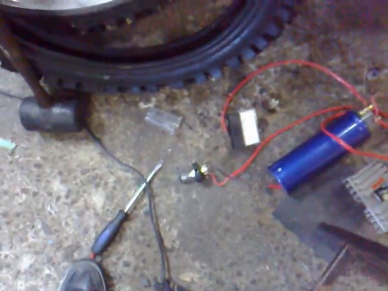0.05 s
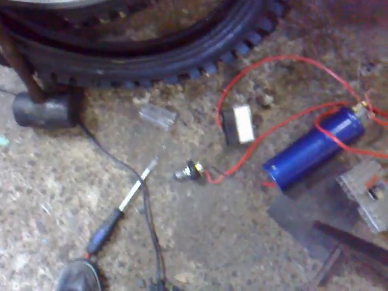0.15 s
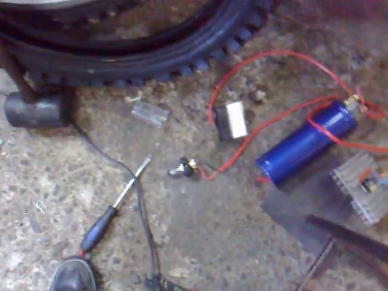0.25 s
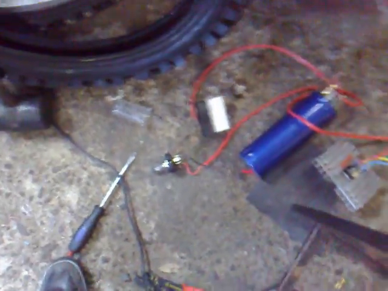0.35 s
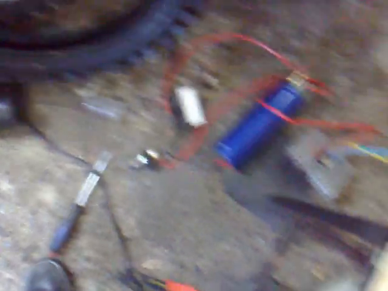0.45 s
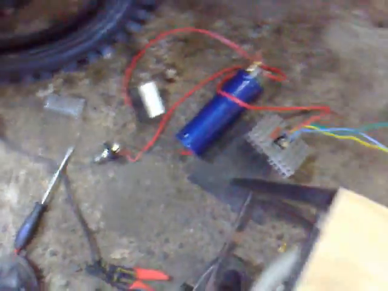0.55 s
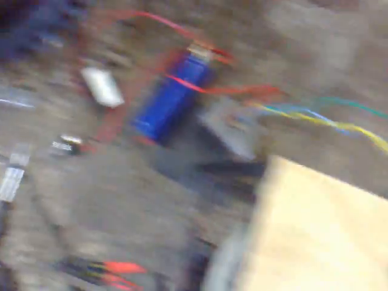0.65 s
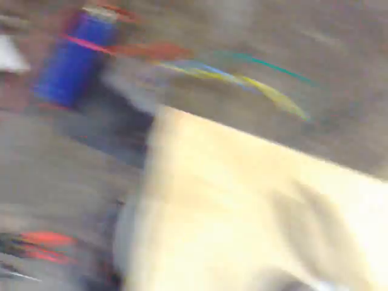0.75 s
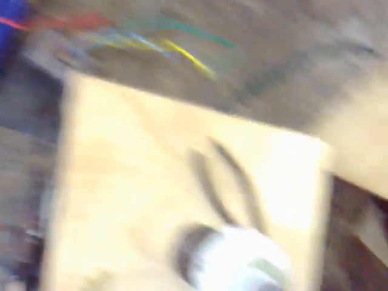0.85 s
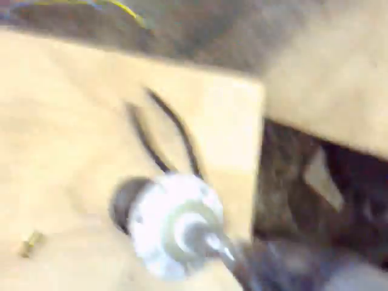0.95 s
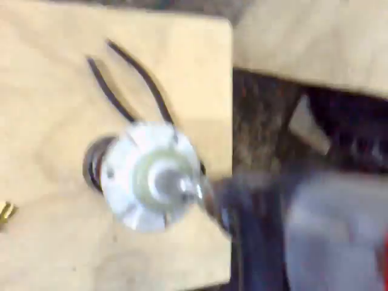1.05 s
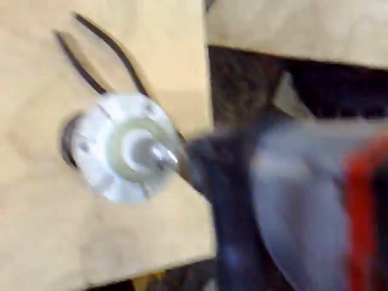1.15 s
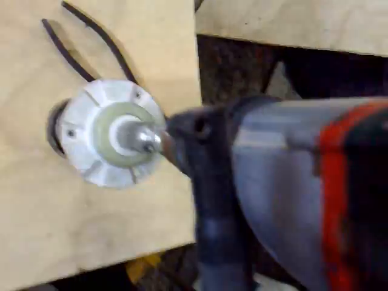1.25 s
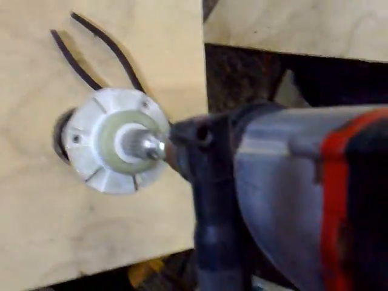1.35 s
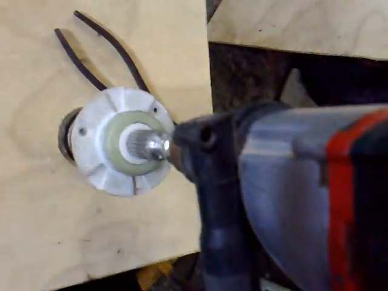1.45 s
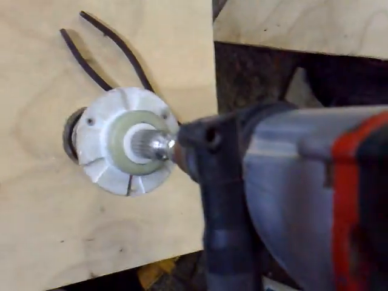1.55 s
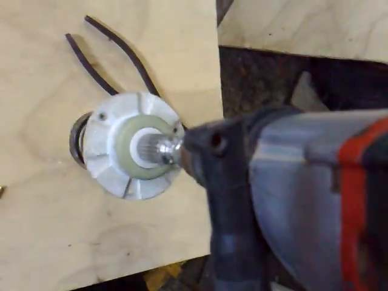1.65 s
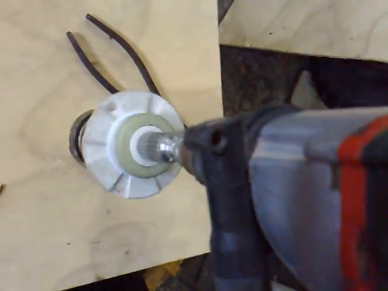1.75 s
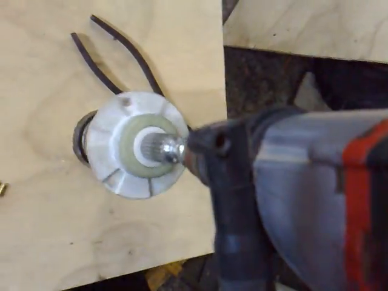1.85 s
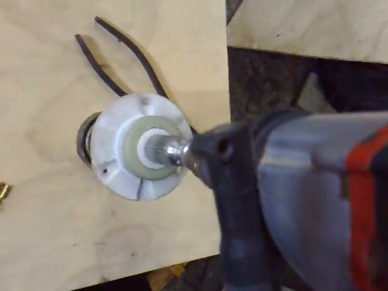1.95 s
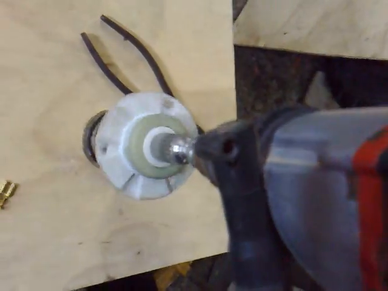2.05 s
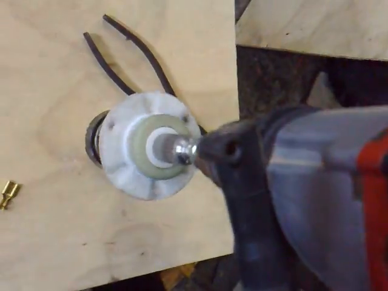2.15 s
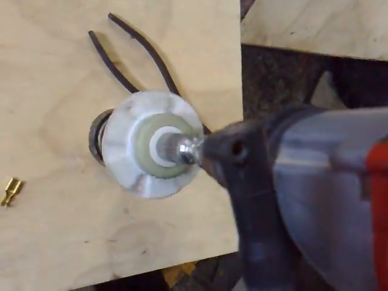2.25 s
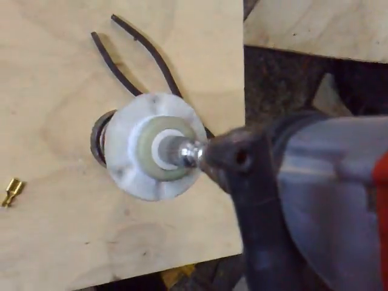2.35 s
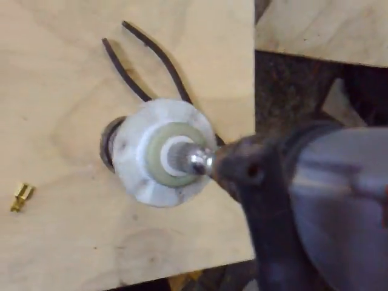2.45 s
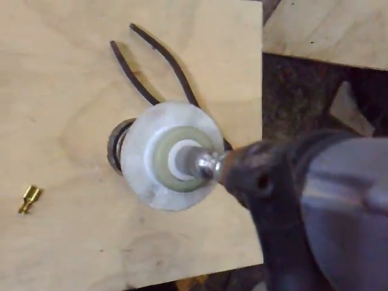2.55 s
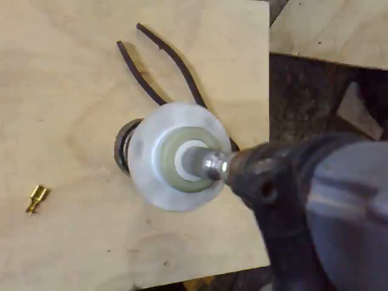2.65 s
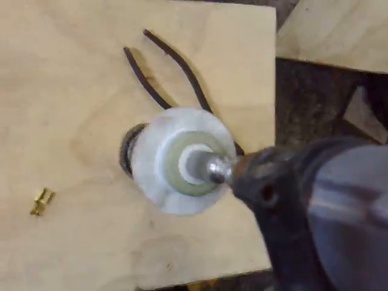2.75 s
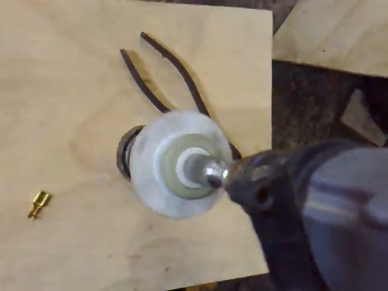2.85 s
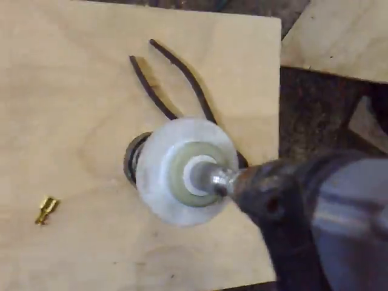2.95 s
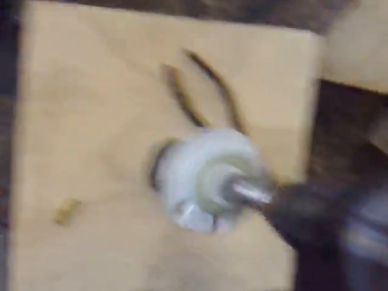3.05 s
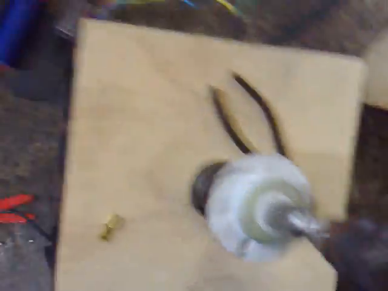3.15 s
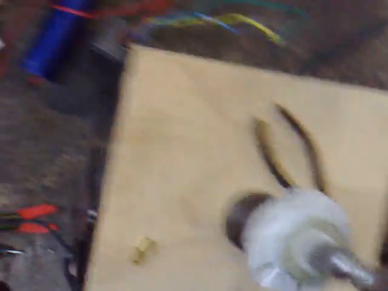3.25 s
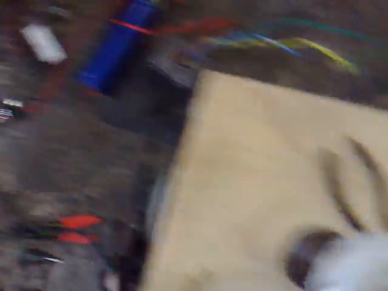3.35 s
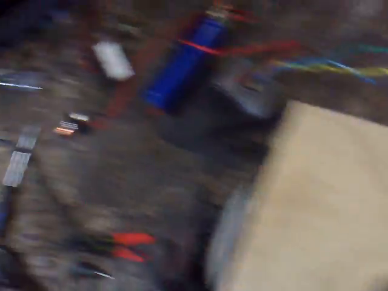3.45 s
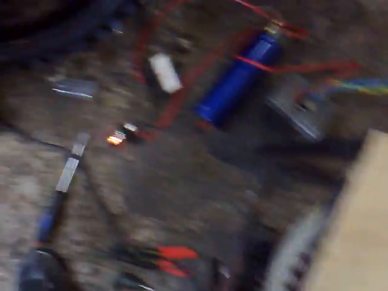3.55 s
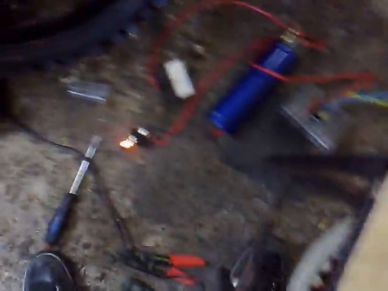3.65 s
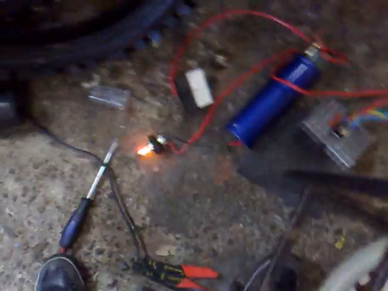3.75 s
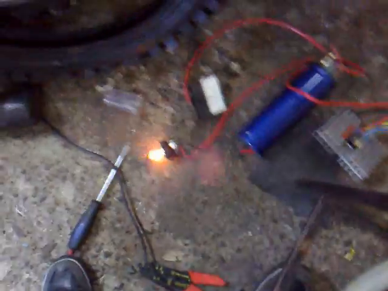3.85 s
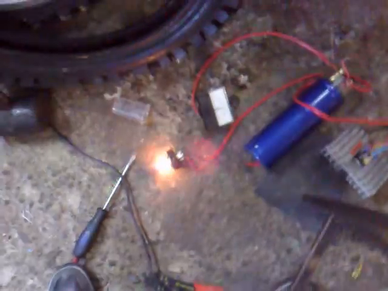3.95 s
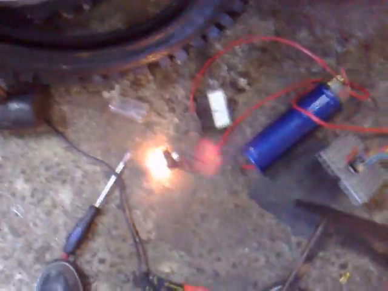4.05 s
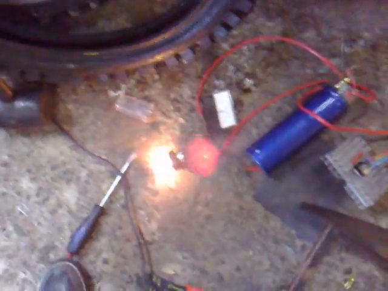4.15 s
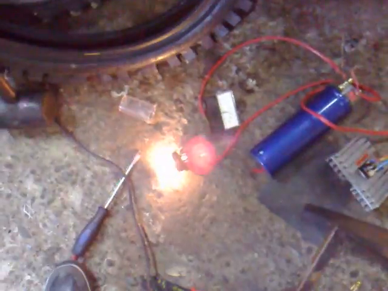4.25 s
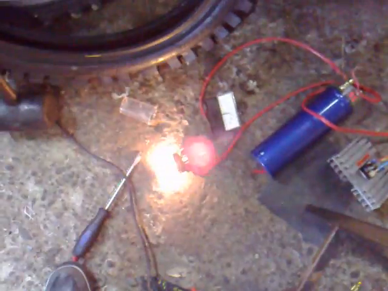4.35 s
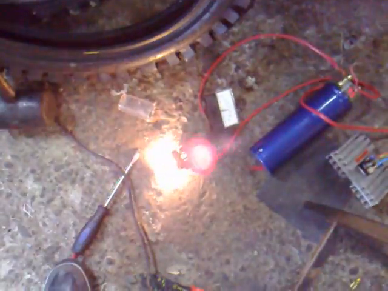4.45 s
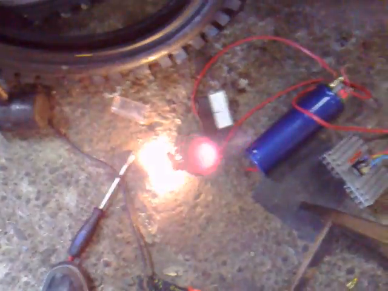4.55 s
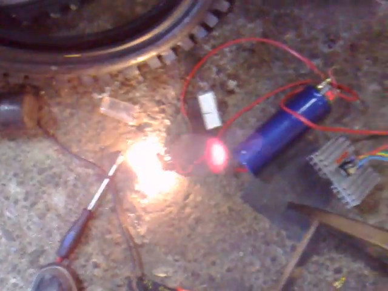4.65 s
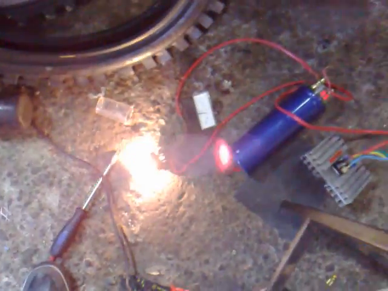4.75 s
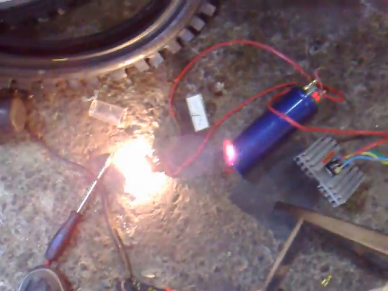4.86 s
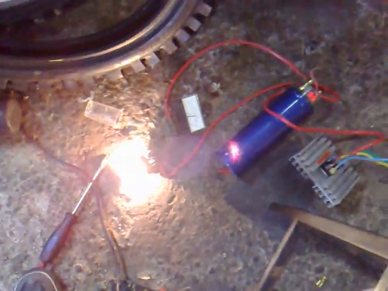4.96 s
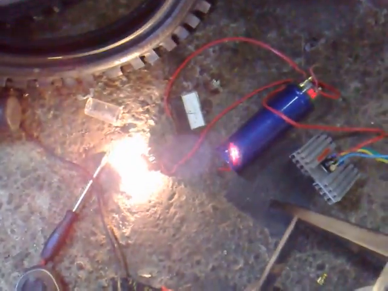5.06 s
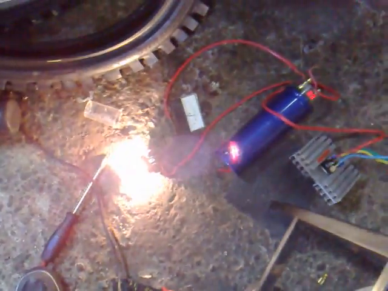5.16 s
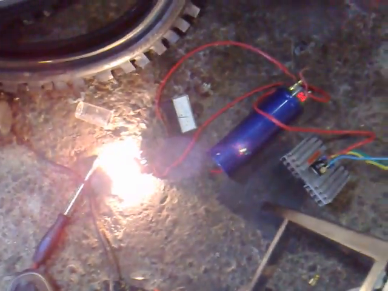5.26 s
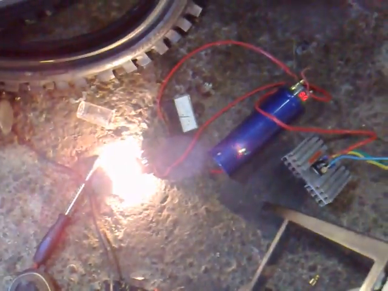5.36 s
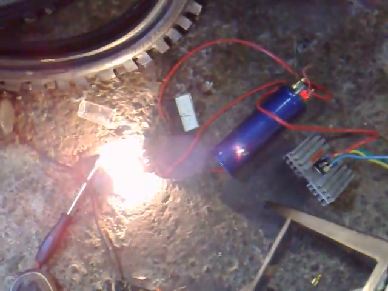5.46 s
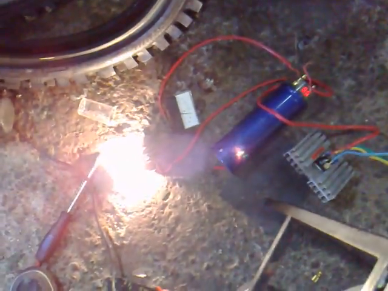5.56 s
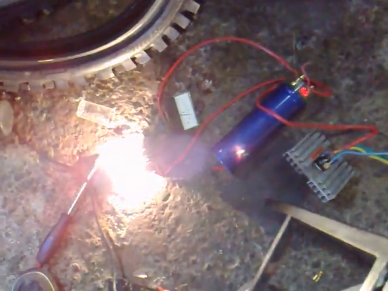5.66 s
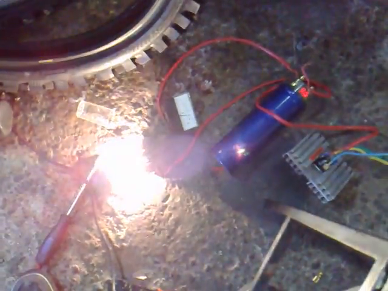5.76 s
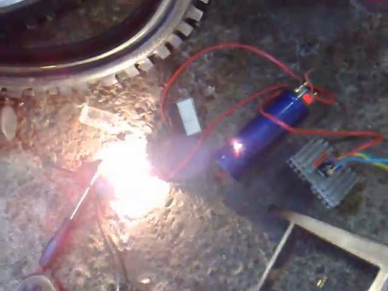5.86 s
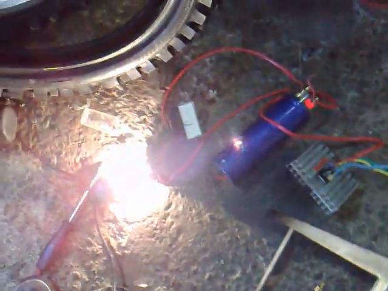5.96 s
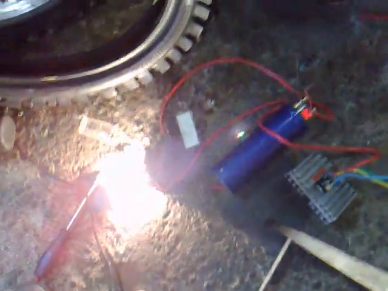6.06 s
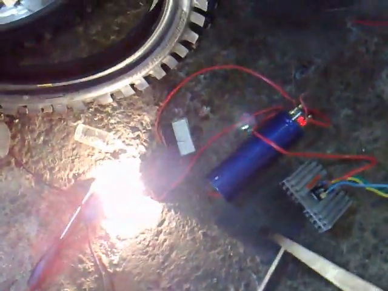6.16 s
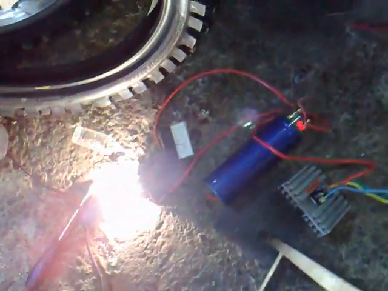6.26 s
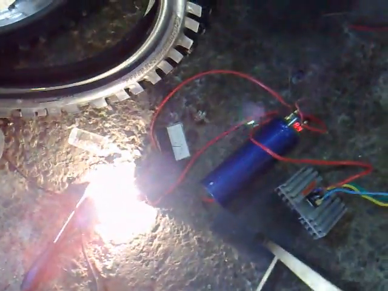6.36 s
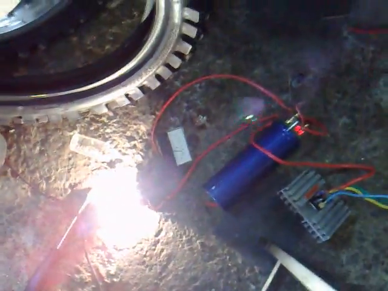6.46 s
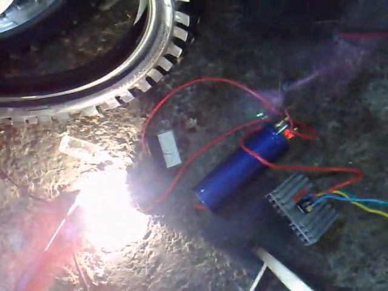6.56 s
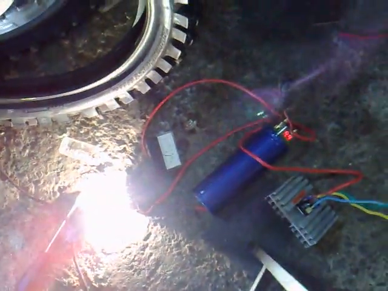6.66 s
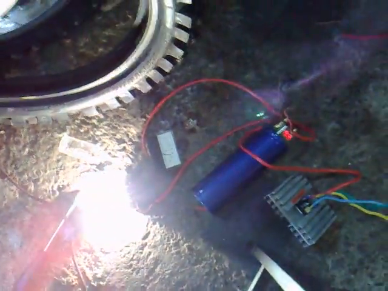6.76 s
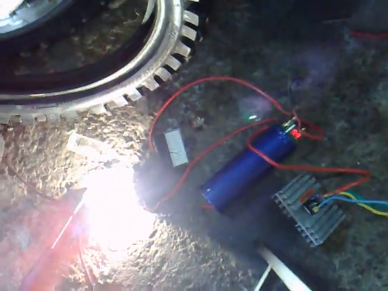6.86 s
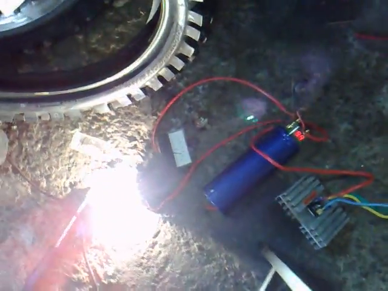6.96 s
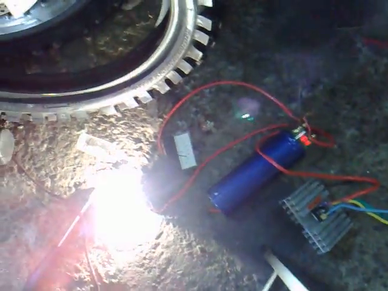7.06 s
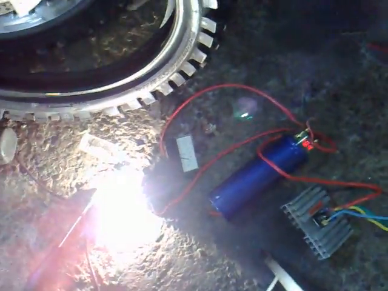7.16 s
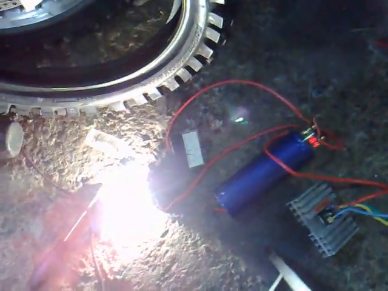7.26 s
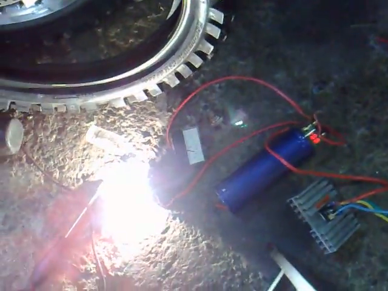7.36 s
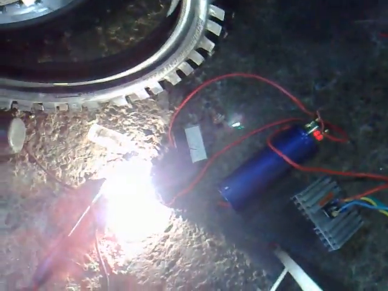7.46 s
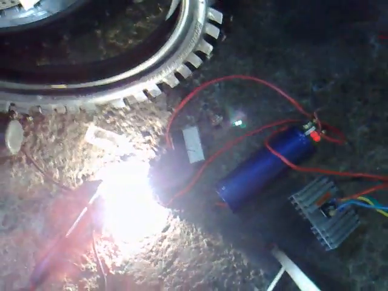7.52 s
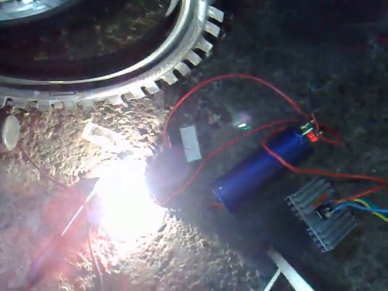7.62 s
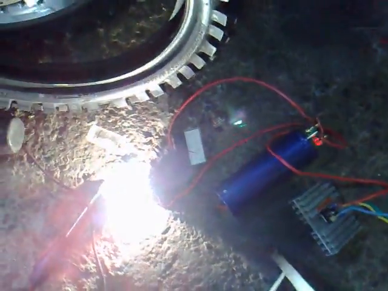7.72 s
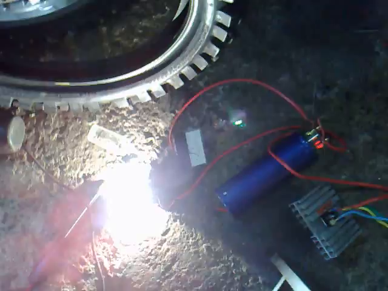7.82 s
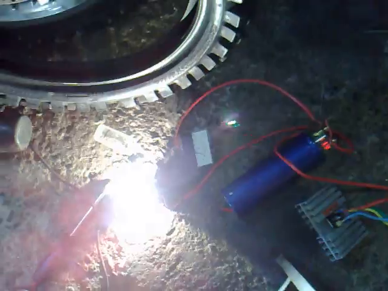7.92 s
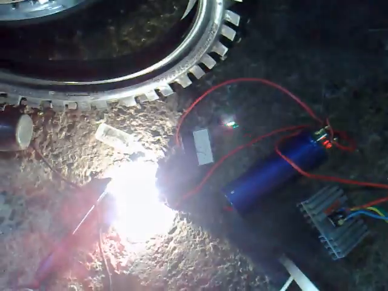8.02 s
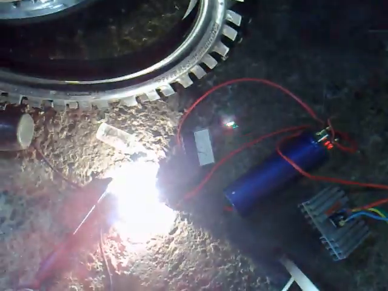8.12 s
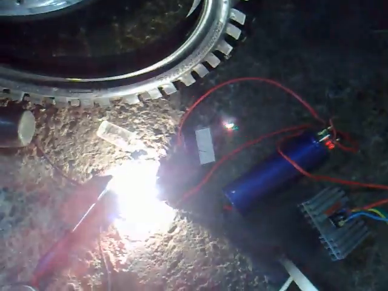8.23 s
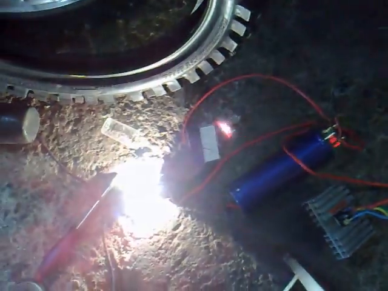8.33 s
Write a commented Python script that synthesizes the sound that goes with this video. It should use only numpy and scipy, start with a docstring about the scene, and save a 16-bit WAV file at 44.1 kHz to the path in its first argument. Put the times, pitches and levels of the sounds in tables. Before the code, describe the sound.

An electric drill drives a small motor on a wooden board, heard from close by in a quiet workshop. From about 0.3 seconds the drill hums and sizzles without turning, and a buzzing crackle from its brushes grows louder. At about 1.6 seconds the gears begin to rattle, with several hard knocks around 2 seconds and a low rising growl. The metal coupling scrapes, then squeals from roughly 2.6 to 3.7 seconds, as a whine climbs and the rattle smooths into a hissing rush. The whine is fairly steady from 4 seconds, then steps up at about 5.5 seconds to a higher, slightly wavering pitch. Underneath, the board shakes with a faint rumble and a few soft bumps. Near 7.9 seconds the pitch falls quickly, and the drill is still running more slowly at the end, around 8.4 seconds.

```python
"""A drill driving a generator

A mains drill spins a small motor as a generator on a board on a workshop floor, heard from close by.
With the trigger barely pressed it stands still: chopped current makes the windings hum and the brushes
crackle. Then the gears rattle through their backlash, the coupling scrapes, and tones locked to the
rotation whine up to speed, step up once more and drop back. The board shakes and booms beneath it."""
import sys
import numpy as np
from scipy import signal
from scipy.fft import rfft, irfft, next_fast_len
from scipy.io import wavfile
from scipy.ndimage import uniform_filter1d

SR = 44100
rng = np.random.default_rng(int(sys.argv[2]) if len(sys.argv) > 2 else 0)


def unload_audio(sound):
    """Save the sound as a 16-bit wav file, at the path given as the first command line argument."""
    columns = np.transpose(np.atleast_2d(sound))
    # keep every value between -1 and 1, then stretch to whole-number steps
    steps = np.round(np.clip(columns, -1, 1) * 32767)
    wavfile.write(sys.argv[1], SR, steps.astype(np.int16))


N = 369999
TIME = np.arange(N) / SR
MAINS_HZ, FIRST_FIRING_S = 50.07, .0058
TRIGGER_S, ROTOR_START_S = .23, 1.55

# rotor speed after the initial creep: (time [s], speed [turns/s])
ROTOR_SPEED = [(2.6, 91), (2.86, 183), (3.0, 223), (3.2, 251), (3.48, 259), (3.68, 293), (3.95, 318),
               (4.48, 320), (4.66, 336), (5.12, 338), (5.38, 353), (5.56, 432), (5.76, 476), (5.96, 487),
               (6.3, 477), (6.56, 485), (7.3, 456), (7.46, 474), (7.86, 465), (8.0, 366), (8.17, 267),
               (8.38, 254)]
# background of the workshop: (frequency [Hz], relative level [dB])
ROOM_SPECTRUM = [(18, -31), (30, -10), (70, -24), (86, -19), (106, -11), (157, -7), (210, -5.5), (364, -15),
                 (499, -14), (1100, -24), (16000, -37)]
# shaking of the board: (frequency [Hz], relative level [dB])
SHAKE_SPECTRUM = [(20, -5), (50, 8.5), (110, 4.5), (200, -4), (350, -17), (800, -50)]
# soft bumps of the board: (time [s], level [dB])
BOARD_BUMPS = [(0.588, -40), (2.94, -33), (3.22, -34), (4.435, -37), (5.57, -31), (6.85, -36)]
# colour of a bump: (frequency [Hz], relative level [dB])
BUMP_SPECTRUM = [(40, -13), (110, -5), (220, -4), (400, -1), (900, -25)]
# partials of the windings: (multiple of the mains frequency [1], level against the hum [dB])
HUM_PARTIALS = [(4, -13.5), (8, -15.5), (12, -10.5), (13, -15), (14, -11.5), (16, -23), (18, -17),
                (20, -16), (21, -34)]
# sizzle of the live windings: (frequency [Hz], relative level [dB])
SIZZLE_SPECTRUM = [(100, -32), (450, 6.5), (800, 2), (1350, -6), (2000, 3.5), (2400, 0), (3200, 6.5),
                   (4000, -1), (5000, -2), (6000, -14), (16000, -20)]
# spells of arcing at standstill: (start [s], end [s], level above the steady growth [dB])
ARCING_SPELLS = [(.375, 0.46, 0.5), (.5, 1.339, 0.8), (1.381, 1.535, 0.5)]
# crackle of the brushes: (frequency [Hz], relative level [dB])
ARC_SPECTRUM = [(600, -22), (1400, -20), (2300, -20), (3100, -16), (4300, -9), (6300, -7.5), (7400, -12),
                (8500, -2.5), (9500, -7), (10000, 2), (12000, -4), (12900, 0), (14000, -10), (16000, -16)]
# resonances of the brush gear: (frequency [Hz], bandwidth [Hz], lift [dB])
BRUSH_RESONANCES = [(3300, 250, 5), (4260, 230, 9.5), (5600, 160, 6), (9950, 200, 4.5)]
# the running drill: (time [s], casing rumble [dB], gear rattle [dB], brush hiss [dB])
RUNNING_LEVELS = [(1.57, -46, -43, -62), (1.69, -39, -21.5, -40.5), (2.06, -37.5, -20.5, -37),
                  (2.27, -32, -13, -27), (2.5, -35.5, -17.5, -31), (2.7, -31, -12, -21),
                  (3.05, -41.5, -15, -21.5), (3.5, -44.5, -15.5, -24), (3.8, -40.5, -19.5, -25.5),
                  (5.35, -39, -19, -25.3), (5.6, -39.5, -18.5, -22.5), (6.6, -38.5, -20.5, -27),
                  (7.85, -37, -20, -27), (8.05, -38, -21.5, -30.5), (8.39, -37.5, -20.5, -30)]
# gears at low speed: (frequency [Hz], relative level [dB])
SLOW_GEAR_SPECTRUM = [(60, -34), (200, -27.5), (400, -15.5), (750, -17), (1100, -1.5), (1650, 2.5),
                      (2000, -2.5), (2600, -8.5), (2950, -3), (3250, 0), (3650, -7), (5000, -3),
                      (6500, -11), (8700, -15.5), (11000, -17), (16000, -28.5)]
# gears at high speed: (frequency [Hz], relative level [dB])
FAST_GEAR_SPECTRUM = [(60, -45), (280, -27.5), (450, -18.5), (700, -12), (1050, -5.5), (1500, -1),
                      (2200, 1), (2500, 1), (3500, -0.5), (4700, 0), (6700, -2), (9000, 1), (11400, 1),
                      (16000, -14)]
# resonances of the housing: (frequency [Hz], bandwidth [Hz], lift [dB])
HOUSING_RESONANCES = [(633, 54, 7.5), (830, 24, 6.5), (1600, 200, 0.5), (2030, 206, 10), (2940, 490, 3.5),
                      (3995, 710, 6), (4760, 126, 2), (5800, 2130, 3), (7650, 100, 3), (10340, 410, 3)]
# the hardest gear knocks at a crawl: (time [s], level [dB])
HARD_KNOCKS = [(1.626, -18), (1.823, -9), (1.889, -6.5), (1.907, -14), (1.923, -4.5), (1.931, -8),
               (1.964, -7.5), (2.064, -9)]
# partials of the growl: (order [cycles/turn], level against the rumble [dB])
GROWL_PARTIALS = [(4, -22), (5, -15), (6, -9), (7, -5.5)]
# the coupling scrapes, then squeals: (start [s], attack [s], end [s], release [s], level [dB])
SCRAPE_SPELLS = [(1.9, 0.77, 2.7, .2, -35), (2.55, 0.19, 3.72, .25, -23)]
# ringing modes of the coupling: (frequency [Hz], bandwidth [Hz], relative level [dB])
COUPLING_MODES = [(2720, 160, -7), (3750, 300, -3), (4130, 150, 0), (5430, 250, -1), (7000, 220, -2.5),
                  (10650, 280, -5), (11950, 200, -11)]
# how the casing carries the sixth order, once faded in: (frequency [Hz], level against the rattle [dB])
SIXTH_ORDER_RESPONSE = [(550, -37), (750, -32), (850, -12.5), (1470, -2.5), (1570, -12.5), (1900, -12),
                        (2030, -9.5), (2400, -10), (2600, -4), (2900, -12.5)]
# how it carries the third order, once faded in: (frequency [Hz], level [dB])
THIRD_ORDER_RESPONSE = [(300, -47), (690, -48), (770, -35.5), (900, -40), (975, -45), (1000, -29),
                        (1100, -32), (1410, -25.5), (1460, -32.5)]
# gear, fan and bearing tones, once faded in:
# (order [cycles/turn], base line width [Hz], level at slow [dB], middle [dB], top speed [dB])
ROTOR_TONES = [(0.997, 3.07, -68, -71, -53.5), (1.266, 1.89, -74, -51, -36.5), (1.731, 2.35, -68, -46, -39),
               (1.96, 5.2, -67, -53, -61), (2.54, 4.6, -61, -42.5, -46), (3.996, 3.97, -45, -39, -39),
               (4.273, 5, -34.5, -35.5, -30.5), (5.55, 3, -60, -51, -34), (5.805, 2.6, -62, -56, -30.5),
               (6.18, 3, -50, -39, -30.5), (9.01, 2, -42, -42, -30), (10.94, 6, -54, -44, -50),
               (12, 45, -48, -35, -36), (13.49, 110, -45, -30.5, -35), (13.97, 9, -58, -30, -42),
               (14.96, 7.5, -37, -37, -34), (16.78, 13, -56, -59, -36), (20.9, 14, -50, -50, -36)]
SLOW_MIDDLE_TOP_SPEEDS = [237, 333, 482]  # turns/s
# commutator whistles: (order [cycles/turn], half width [Hz], level at resonance against the hiss [dB])
COMMUTATOR_WHISTLES = [(24, 55, -3), (27, 70, -4), (33, 140, -13), (36, 100, -6.5), (48, 90, -5.5),
                       (60, 120, -11)]


def from_db(db):
    """Amplitude grows tenfold with every 20 dB."""
    return 10 ** (np.asarray(db) / 20)


def rms_one(x):
    """Normalisation to unit mean power."""
    return x / np.sqrt(np.mean(x ** 2) + 1e-20)


def curves(table, at):
    """Linear interpolation of each further column of a table along its first."""
    axis, *columns = np.transpose(table)
    return [np.interp(at, axis, column) for column in columns]


def held(start_s, attack_s, end_s, release_s):
    """A trapezoidal envelope: it rises to 1, holds and is back at 0 by its end."""
    return np.clip(np.minimum((TIME - start_s) / attack_s, (end_s - TIME) / release_s), 0, 1)


def drift(rate_hz):
    """Low-passed noise gives a slow random fluctuation of unit spread."""
    step, settling = 20, 2000  # samples per slow value; slow values skipped
    pole = np.exp(-2 * np.pi * rate_hz * step / SR)
    noise = rng.standard_normal(N // step + settling + 2)
    slow = signal.lfilter([1], [1, -2 * pole, pole * pole], noise)[settling:]
    return np.interp(np.arange(N) / step, np.arange(len(slow)), rms_one(slow))


def tone(cycles, order, width_hz, rough):
    """Random modulation of amplitude and phase broadens a spectral line of unit power."""
    waver = 1 + rough * (drift(width_hz) + 1j * drift(width_hz))
    return rms_one(np.real(waver * np.exp(2j * np.pi * order * cycles)))


def resonance(hz, centre_hz, width_hz):
    """Complex response of a damped mode, 1 at its peak."""
    return 1 / (1 + 2j * (hz - centre_hz) / width_hz)


def coloured(x, spectrum, modes=()):
    """Linear filtering by a smooth spectrum and resonant modes; white noise keeps its power."""
    size = next_fast_len(N + SR // 10)
    hz = np.arange(size // 2 + 1) * SR / size
    points_hz, points_db = np.transpose(spectrum)
    gain = from_db(np.interp(np.log(hz + 1), np.log(points_hz), points_db))
    for centre_hz, width_hz, lift_db in modes:
        gain = gain * (1 + (from_db(lift_db) - 1) * resonance(hz, centre_hz, width_hz))
    return irfft(rfft(x, size) * gain, size)[:N] / np.sqrt(np.mean(np.abs(gain) ** 2))


def steady_band(x, low_hz, high_hz):
    """A frequency band divided by its running rms keeps a steady level."""
    bandpass = signal.butter(4, [low_hz, high_hz], "band", fs=SR, output="sos")
    band = signal.sosfiltfilt(bandpass, x, padtype="even", padlen=SR // 10)
    return band / np.sqrt(uniform_filter1d(band ** 2, SR // 5) + 1e-12)


def decay(x, seconds):
    """Damping makes every impulse die away exponentially."""
    return signal.lfilter([1], [1, -np.exp(-1 / (seconds * SR))], x + 1e-18)


def bursts(events, seconds):
    """Each impact excites a damped burst of broadband noise."""
    clicks = np.zeros(N)
    for time_s, level_db in events:
        clicks[round(time_s * SR)] = from_db(level_db)
    return decay(clicks, seconds) * rng.standard_normal(N)


def reverberate(x, wet_db, t60_s=.12):
    """Dense reflections off the floor and clutter form an exponentially decaying tail."""
    t = np.arange(SR // 3) / SR
    tail = rng.standard_normal(len(t)) * from_db(-60 * t / t60_s) * (t > .002)
    return x + from_db(wet_db) * signal.fftconvolve(x, tail / np.sqrt(np.sum(tail ** 2)))[:N]


def firings(weak_db, scatter_db):
    """Phase control fires once per mains half-wave, every second time more weakly."""
    at = (np.arange(FIRST_FIRING_S, TIME[-1], .5 / MAINS_HZ) * SR).astype(int)
    clicks = np.zeros(N)
    clicks[at] = from_db(weak_db * (np.arange(len(at)) % 2) + scatter_db * rng.standard_normal(len(at)))
    return clicks


def rotor_speed():
    """In turns/s: the rotor creeps away by a power law, then follows the trigger."""
    speed, = curves(ROTOR_SPEED, TIME)
    creep = np.clip((TIME - ROTOR_START_S) / (ROTOR_SPEED[0][0] - ROTOR_START_S), 0, 1)
    return speed * creep ** .65


def room_tone():
    """Stationary noise, strongest in the bass, forms the background."""
    return from_db(-60.5) * coloured(rng.standard_normal(N), ROOM_SPECTRUM)


def board(speed, turns, strain):
    """Forced vibration: the plywood shakes, bumps, and booms as the spindle's wobble meets its mode."""
    wobble_order = .42
    shake = (from_db(-66.5) + from_db(-52.5) * strain) * coloured(rng.standard_normal(N), SHAKE_SPECTRUM)
    lift = np.abs(resonance(wobble_order * speed, centre_hz=176, width_hz=22)) ** 2
    boom = from_db(-52) * lift * tone(turns, wobble_order, width_hz=7.1, rough=.4)
    bumps = coloured(bursts(BOARD_BUMPS, seconds=.0084), BUMP_SPECTRUM)
    return shake + boom + bumps


def winding_hum(speed, strain):
    """Periodic forcing: chopped current shakes the windings at mains harmonics; each firing sizzles."""
    cycles = MAINS_HZ * TIME
    current = np.clip((TIME - TRIGGER_S) / .47, 0, 1)
    level = from_db(np.interp(speed, [50, 280], [-42, -58.5]))  # fainter as the rotor gets free
    partials = sum(from_db(db) * tone(cycles + rng.random(), order, width_hz=2.7, rough=.38)
                   for order, db in HUM_PARTIALS)
    # one partial rings in the casing, most strongly at first
    swell = from_db(-8) + from_db(-1) * held(start_s=.485, attack_s=.031, end_s=.93, release_s=.2)
    ring = swell * tone(cycles, order=10, width_hz=2.5, rough=.06)
    surges = rms_one(decay(firings(weak_db=-5.5, scatter_db=1.5), seconds=.0074))
    sizzle = from_db(-1.5) * coloured(surges * rng.standard_normal(N), SIZZLE_SPECTRUM)
    # the drone swells with strain and sinks near full speed, where the current is hardly chopped
    drone_level = from_db(np.interp(speed, [400, 465], [-64.5, -68])) + from_db(-61) * strain
    drone = drone_level * tone(cycles, order=2, width_hz=3.8, rough=.29)
    return current * (level * (partials + sizzle + ring) + drone)


def brush_arcing(growth_db_per_s=21.5, edge_s=.0055, flare_s=.0009):
    """Impulse excitation: each firing rings the standing brushes alike and draws a spitting spark."""
    jolts = firings(weak_db=-9, scatter_db=1)
    t = np.arange(SR // 100) / SR
    flare = (1 - np.exp(-t / flare_s)) * np.exp(-t / flare_s)
    ring = rms_one(signal.fftconvolve(jolts, flare * rng.standard_normal(len(t)))[:N])
    spark = rms_one(signal.fftconvolve(jolts, flare)[:N] * rng.standard_normal(N))
    crackle = coloured(rms_one(.48 * ring + spark), ARC_SPECTRUM, BRUSH_RESONANCES)
    # the arcing grows with the squeeze of the trigger until the rotor starts
    level_db = -20 - growth_db_per_s * np.maximum(ROTOR_START_S - TIME, 0)
    spells = sum(from_db(db) * held(start, edge_s, end, edge_s) for start, end, db in ARCING_SPELLS)
    return reverberate(spells * from_db(level_db) * crackle, wet_db=-13.5)


def rattle(turns, spectrum, knocks_per_turn, knock_db, pulse_db, scatter_db):
    """Friction and backlash: teeth rub and knock at random, with more force at each push of current."""
    impacts = rng.random(N) < knocks_per_turn * np.gradient(turns)
    sizes = from_db(scatter_db * rng.uniform(-.88, 1, N))
    knocks = rms_one(np.tanh(decay(impacts * sizes, seconds=.0011) / 2))
    pulses = decay(firings(weak_db=-3, scatter_db=2), seconds=.0012)
    push = rms_one(decay(pulses, seconds=.0007))
    force = (1 + from_db(knock_db) * knocks + from_db(pulse_db) * push) * from_db(.5 * drift(14))
    radiated = coloured(force * rng.standard_normal(N), spectrum, HOUSING_RESONANCES)
    return rms_one(reverberate(radiated, wet_db=-9.5))


def gears(speed, turns, rumble_db, rattle_db, hiss_db):
    """As the impact rate rises, separate knocks fuse into a smooth, slightly wavering rush."""
    crawl = rattle(turns, SLOW_GEAR_SPECTRUM, 3, knock_db=11, pulse_db=7, scatter_db=5.5)
    loaded = rattle(turns, SLOW_GEAR_SPECTRUM, 2.5, knock_db=-8, pulse_db=-18, scatter_db=5)
    fast = rattle(turns, FAST_GEAR_SPECTRUM, 1.2, knock_db=-10.5, pulse_db=-22, scatter_db=12)
    # equal-power crossfades, one by time and one by speed
    free = np.clip((TIME - 3.3) / .19, 0, 1)
    running = np.sqrt(1 - free) * loaded + np.sqrt(free) * fast
    merged = np.clip((speed - 65) / 60, 0, 1)
    rush = np.sqrt(1 - merged) * crawl + np.sqrt(merged) * running
    low = from_db(rumble_db) * steady_band(rush, 90, 900)
    middle = from_db(rattle_db) * steady_band(rush, 850, 6600)
    high = from_db(hiss_db) * steady_band(rush, 6400, 17000)
    turning = np.clip((speed - 1) / 3, 0, 1)
    return turning * from_db(.6 * drift(5.3)) * (low + middle + high)


def gear_knocks():
    """The hardest tooth impacts excite the modes of the housing."""
    return coloured(bursts(HARD_KNOCKS, seconds=.0016), SLOW_GEAR_SPECTRUM, HOUSING_RESONANCES)


def growl(speed, turns, rumble_db):
    """At a crawl every turn jerks the gears; this periodic force gives a low, rising harmonic chord."""
    chord = sum(from_db(db) * tone(turns, order, width_hz=8.5, rough=.4) for order, db in GROWL_PARTIALS)
    crawling = np.interp(speed, [35, 62.6, 114, 169], [0, 1, 1, 0])
    return from_db(rumble_db) * crawling * chord


def coupling_scrape():
    """Friction of metal on metal keeps a few modes ringing, in step with the pulsing torque."""
    pressure = sum(from_db(db) * held(*shape) for *shape, db in SCRAPE_SPELLS)
    ringing = sum(from_db(db) * tone(hz * TIME, order=1, width_hz=width_hz, rough=4)
                  for hz, width_hz, db in COUPLING_MODES)
    torque = 1 + .3 * np.sin(4 * np.pi * MAINS_HZ * (TIME - FIRST_FIRING_S))
    return pressure * ringing * torque


def whine(speed, turns, rattle_db):
    """Fan and gear tones are orders of the rotation; the sixth grows with load, others join at speed."""
    sixth_db, = curves(SIXTH_ORDER_RESPONSE, 6 * speed)
    third_db, = curves(THIRD_ORDER_RESPONSE, 3 * speed)
    leading = from_db(rattle_db + sixth_db) * tone(turns, order=6, width_hz=22, rough=.25)
    others = from_db(third_db) * tone(turns, order=3, width_hz=14, rough=.24)
    for order, width_hz, *levels_db in ROTOR_TONES:
        rough = np.clip(width_hz / 14, .35, 2)  # narrow lines are firm, wide ones mostly noise
        level = from_db(np.interp(speed, SLOW_MIDDLE_TOP_SPEEDS, levels_db))
        others += level * tone(turns, order, width_hz + 12, rough)
    joining = np.clip((speed - 190) / 55, .1, 1)
    return leading + joining * others


def commutator(speed, turns, hiss_db):
    """Bars pass under the brushes; each harmonic swells as it sweeps through the holder's resonance."""
    whistles = 0
    for order, half_width_hz, level_db in COMMUTATOR_WHISTLES:
        lift = np.abs(resonance(order * speed, centre_hz=11500, width_hz=2500)) ** 2
        chatter = tone(turns, order, 2 * half_width_hz, rough=1.1)
        whistles += from_db(hiss_db + level_db) * lift * chatter
    return whistles


def scene():
    """Superposition of the drill, its board and the quiet workshop, alike in both channels."""
    speed = rotor_speed()
    turns = np.cumsum(speed * (1 + .001226 * drift(10))) / SR
    strain = held(start_s=1.35, attack_s=.9, end_s=3.65, release_s=.7)  # the effort of spinning up
    rumble_db, rattle_db, hiss_db = curves(RUNNING_LEVELS, TIME)
    mix = room_tone() + board(speed, turns, strain)
    mix += winding_hum(speed, strain) + brush_arcing()
    mix += gears(speed, turns, rumble_db, rattle_db, hiss_db) + gear_knocks()
    mix += growl(speed, turns, rumble_db) + coupling_scrape()
    fade_in = np.clip((speed - 1) / 170, 0, 1)
    mix += fade_in * (whine(speed, turns, rattle_db) + commutator(speed, turns, hiss_db))
    return np.tile(mix, (2, 1))


def record(dry, ceiling=.9, cutoff_hz=15900):
    """Soft saturation rounds the peaks, and a steep low-pass filter removes the highest treble."""
    rounded = dry / (1 + (dry / ceiling) ** 4) ** .25
    return signal.sosfilt(signal.ellip(10, .2, 80, cutoff_hz, fs=SR, output="sos"), rounded)


dry = scene()
out = record(dry)
unload_audio(out)
```